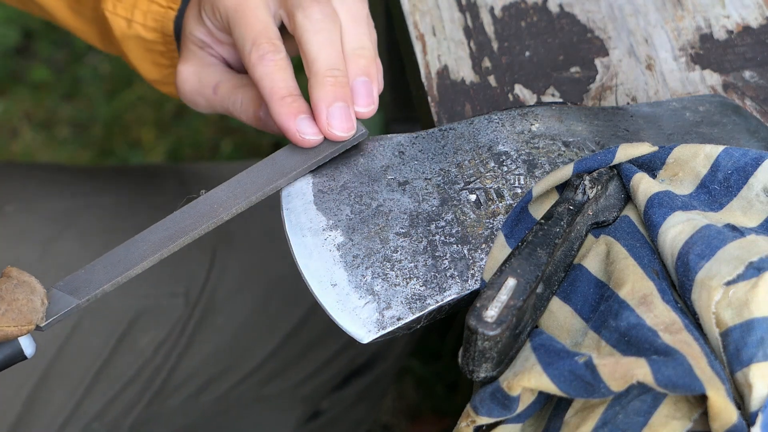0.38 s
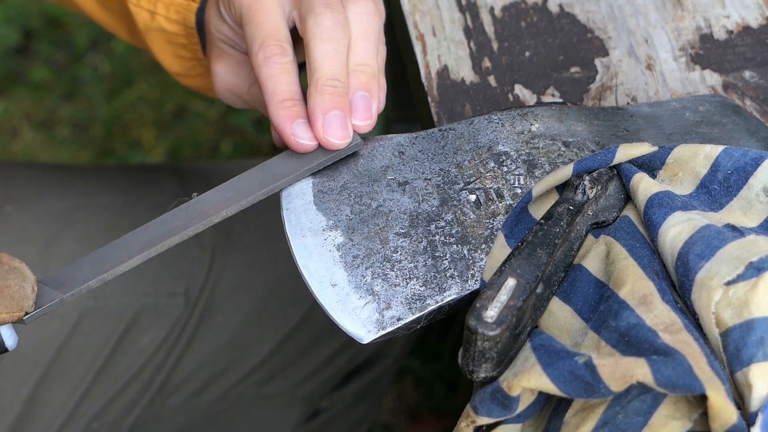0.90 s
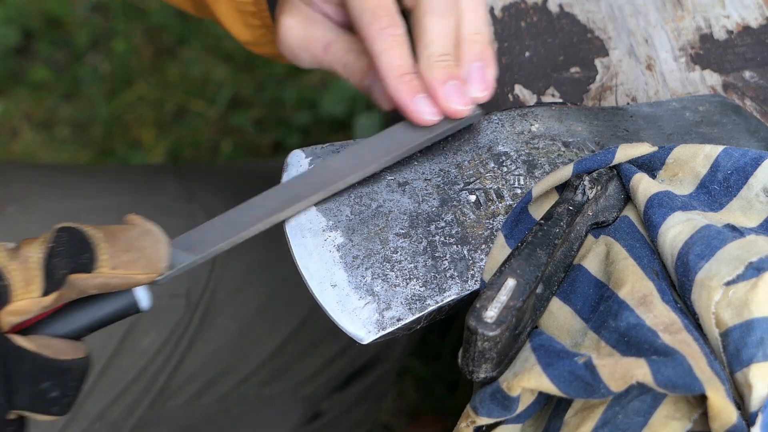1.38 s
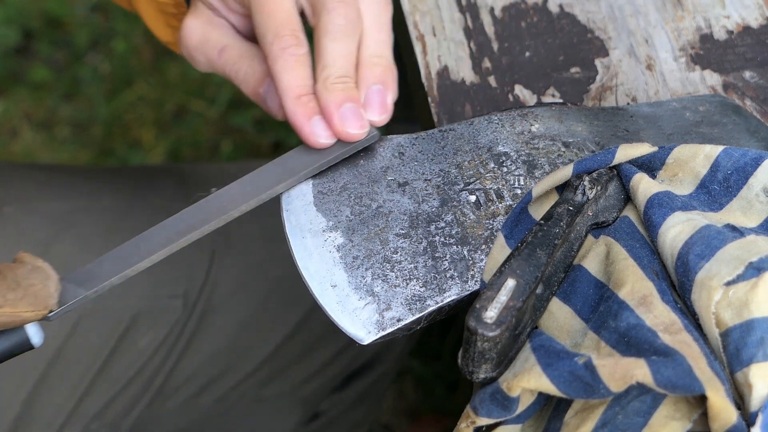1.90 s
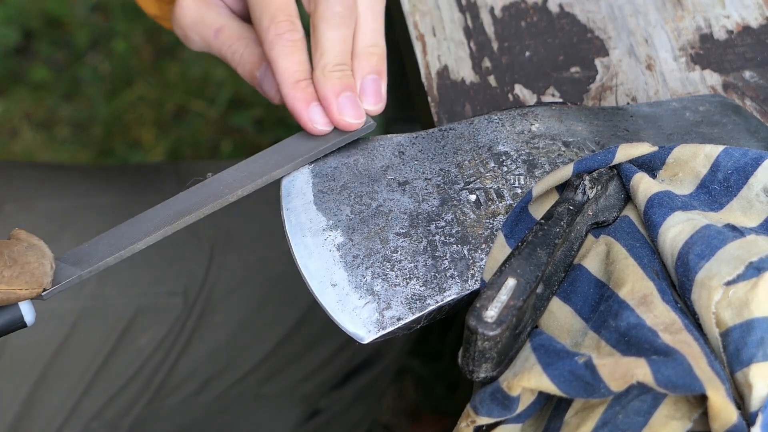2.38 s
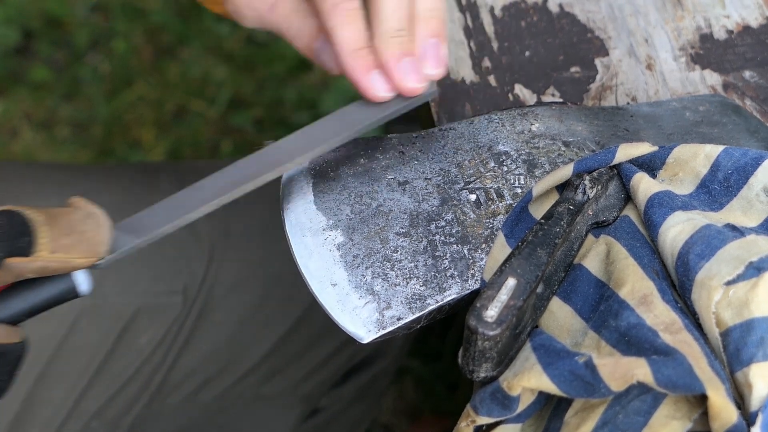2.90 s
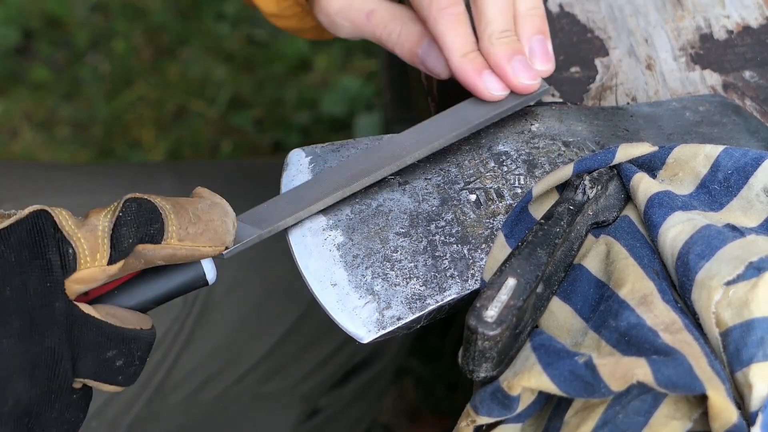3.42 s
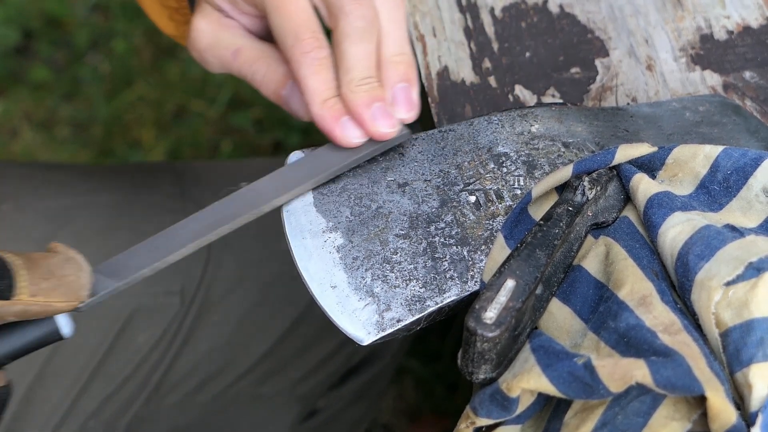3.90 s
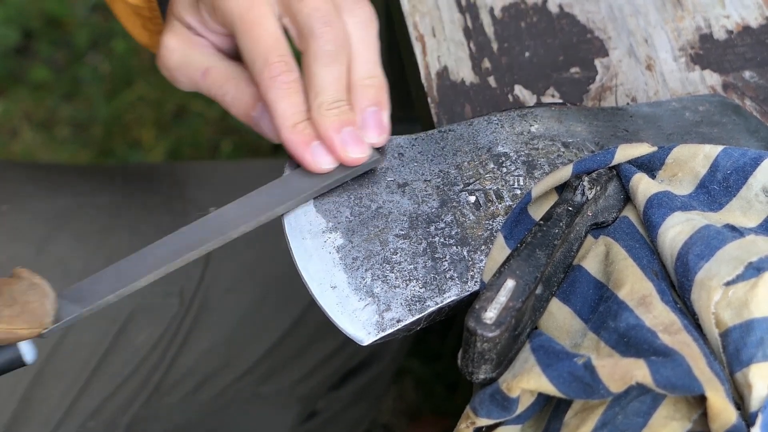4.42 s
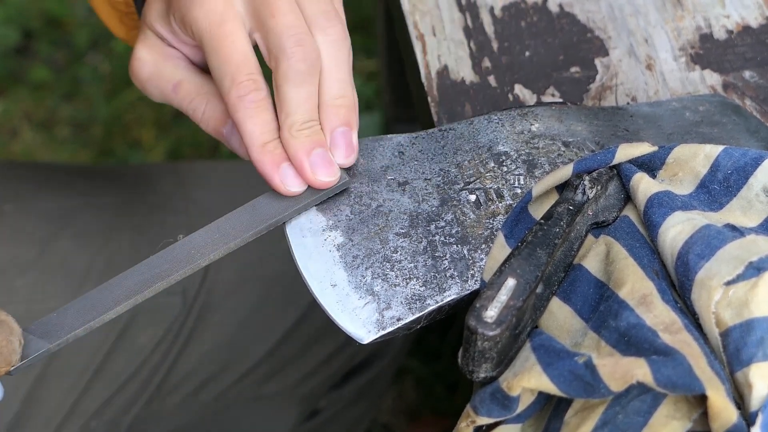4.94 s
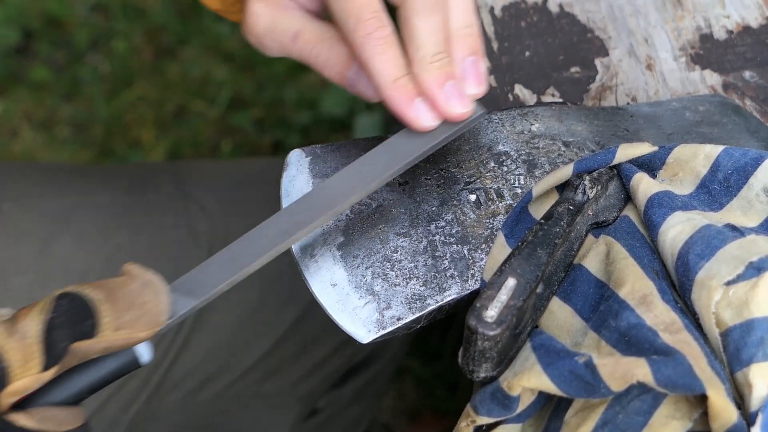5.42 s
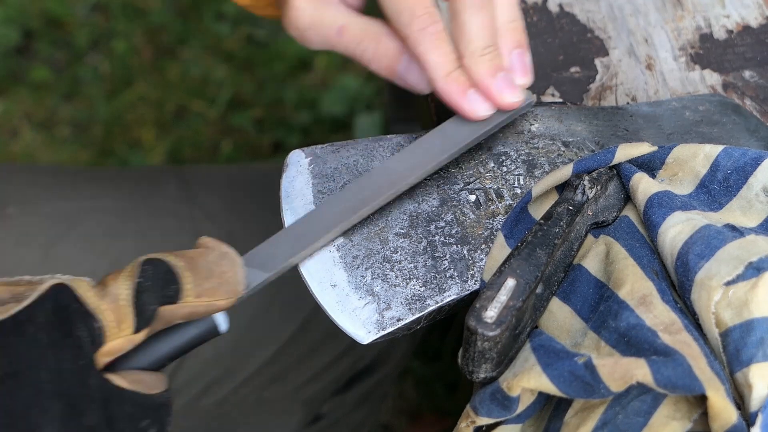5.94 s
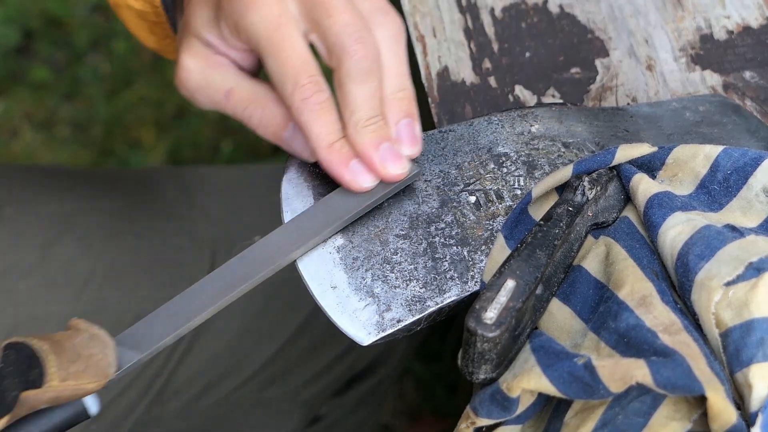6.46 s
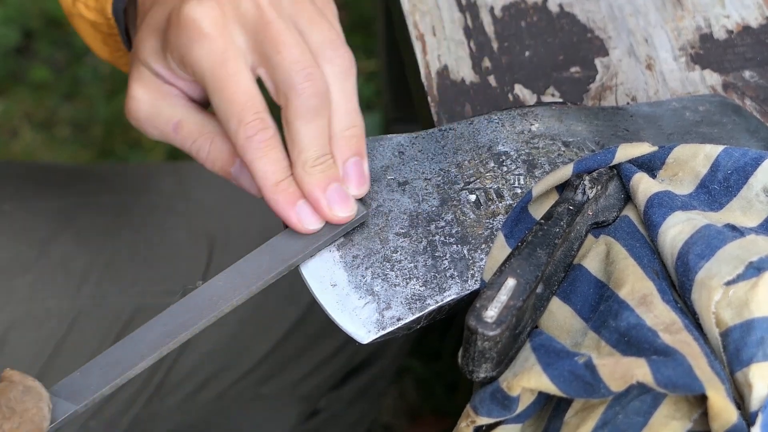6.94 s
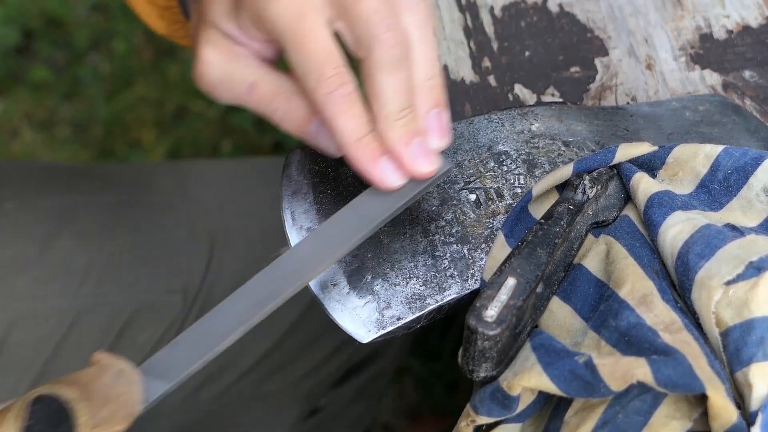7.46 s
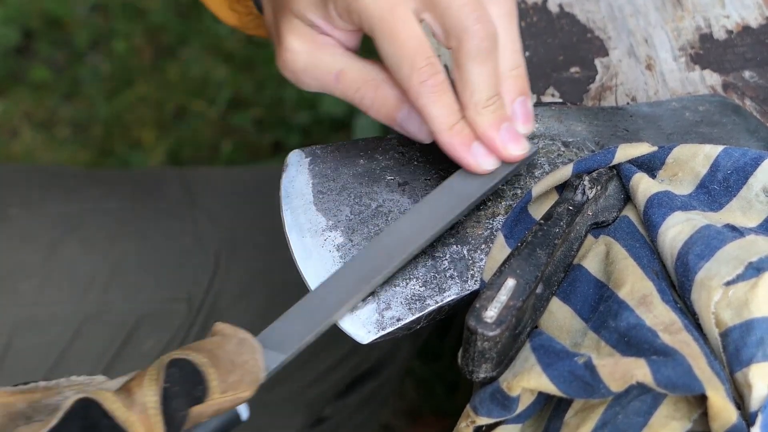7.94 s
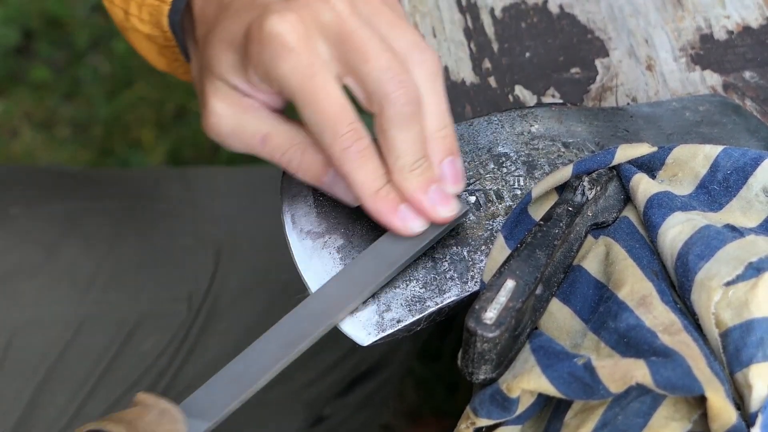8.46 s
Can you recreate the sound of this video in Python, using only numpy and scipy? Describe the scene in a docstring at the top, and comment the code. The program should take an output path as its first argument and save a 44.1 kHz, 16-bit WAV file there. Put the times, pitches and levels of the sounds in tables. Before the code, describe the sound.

Close outdoors, a flat steel file works an axe head resting on a log. Two light clacks and faint scrapes come first, then a swelling rasp, then regular strokes about every two thirds of a second: hard clack, brief skid, bright gritty push, quick lift-off. Many rasps carry a falling toothy whine, and some end in a thin squeal. Wide, soft air wash lies behind, with a faint low hum later.

```python
"""Outdoors, close to an axe on a log: a wide, quiet wash of air lies under everything from the start.
A flat steel file lands on the edge with a clack, skids, and is pushed across it, stroke after stroke.
Struck or rubbed, the same modes of file, axe head and log ring; ground, clamp and a wall some metres off answer.
In many strokes, early and late, a falling tooth tone joins the rasp; thin squeals mark some lift-offs.
A low far hum comes up later."""
import sys
import numpy as np
from scipy import signal
from scipy.fft import rfft, irfft, next_fast_len
from scipy.io import wavfile
from scipy.ndimage import uniform_filter1d

SR = 44100
rng = np.random.default_rng(int(sys.argv[2]) if len(sys.argv) > 2 else 0)


def to_wav(sig):
    """Store sig (one row per channel, or 1-D mono) as 16-bit WAV at the path in sys.argv[1].

    Samples outside -1..1 are clipped; the rate is SR.
    """
    pcm = np.clip(np.atleast_2d(sig), -1, 1) * 32767
    pcm = np.round(pcm).astype(np.int16)
    wavfile.write(sys.argv[1], SR, pcm.T)  # frames by channels


N = 378819  # length in samples


def gain_of(db):
    """Decibels to an amplitude factor."""
    return 10 ** (np.asarray(db) / 20)


def evened(x):
    """Scales to rms 1."""
    return x / np.sqrt(np.mean(x ** 2) + 1e-20)


def read(points, hz):
    """Reads a table on a log-frequency axis."""
    f, value = np.transpose(points)
    return np.interp(np.log(hz + 1), np.log(f + 1), value)


def along(points):
    """Reads a curve over time at every sample."""
    s, value = np.transpose(points)
    return np.interp(np.arange(N) / SR, s, value)


def add(mix, s, sound):
    """Mixes a sound in at time s."""
    part = mix[:, round(s * SR):][:, :sound.shape[1]]
    part += sound[:, :part.shape[1]]


def coloured(x, points):
    """Filters by a spectrum in dB, then scales to rms 1."""
    size = next_fast_len(N)
    spectrum_gain = gain_of(read(points, np.fft.rfftfreq(size, 1 / SR)))
    return evened(irfft(rfft(x, size) * spectrum_gain, size)[..., :N])


def drift(per_s):
    """Slow random wander of rms about 1: straight lines between random knots."""
    knots = rng.standard_normal(int(N / SR * per_s) + 2)
    return np.interp(np.arange(N) / SR * per_s, np.arange(len(knots)), knots) * np.sqrt(3 / 2)


# modes of file, axe head and log: [f/Hz, t60/s when rubbed, relative level/dB rubbed, relative level/dB struck]
MODES = [(165, 0.17, -4.5, -13), (226, 0.092, -4, -27), (332, 0.065, 4.5, 5.5), (468.6, 0.059, -1.5, -0.5),
         (544, 0.035, 0.5, 4), (611.7, 0.16, -10.5, -7), (773, 0.079, -13, -7), (991, 0.032, -14.5, -18.5),
         (1120, 0.05, -16, -26), (1290, 0.018, -11, -13), (1620, 0.022, -16, -10), (1847, 0.033, -8.5, -13),
         (2116, 0.01, -2, 0.5), (2446, 0.025, -10.5, -12.5), (2730, 0.033, -8.5, -9.5),
         (2862, 0.032, 5.5, -11), (3086, 0.04, -2, -7.5), (3365, 0.04, 4, -9.5), (3970, 0.0078, -31, -15),
         (4570, 0.021, -2.5, 3), (5285, 0.012, -8, -14), (5564, 0.014, 0, 12), (6370, 0.011, -5, 5),
         (7170, 0.042, -7, -0.5), (7800, 0.04, -13.5, -9), (8280, 0.0056, 4.5, 8), (9400, 0.017, -2, 2),
         (10030, 0.013, -5, -4), (11030, 0.0077, -14, -15)]
# borders of the five mode groups, log thud, axe head, blade, upper ring, top treble: [f/Hz]
GROUP_TOPS_HZ = [900, 2610, 4100, 8250]


def mode_shares(db):
    """Group of each mode, and its gain so that every group has power 1."""
    group = np.searchsorted(GROUP_TOPS_HZ, [m[0] for m in MODES])
    power = gain_of(db) ** 2
    return group, np.sqrt(power / np.bincount(group, power)[group])


# stereo lean of the steel at the microphone: [f/Hz, left minus right level/dB]
LEAN = [(60, 0.5), (130, -4), (290, -3.5), (640, -5), (1410, 1.5), (3100, 1), (6820, -1), (15000, 4.5)]


def sides(hz):
    """Left and right gains at a frequency: half the lean each way."""
    return gain_of(read(LEAN, hz) * np.array([[.5], [-.5]]))


# wash common to both sides: [f/Hz, relative level/dB per Hz]
AIR_MID = [(18, -62), (30, -32), (154, -6.5), (253, -9), (374, -8.5), (415, -9), (645, -12), (928, -12.5),
           (2370, -21), (3590, -26), (9150, -27.5), (15000, -40)]
# wash opposed between the sides: [f/Hz, relative level/dB per Hz]
AIR_SIDE = [(18, -71.5), (30, -37), (122, -2.5), (312, -0.5), (629, -5.5), (928, -9), (2430, -21.5),
            (2990, -25), (4090, -31), (5300, -31), (15000, -39)]
# level of the common wash, before its drift: [t/s, level/dB]
AIR_LEVEL = [(0, -58.5), (.6, -54.5), (1.7, -55.5), (3.3, -52.5), (5.2, -55.5), (8.2, -54)]
# level of the far hum midway between the sides: [t/s, level/dB]
HUM_LEVEL = [(3.6, -79.5), (4.8, -61), (5.5, -55.5), (6.5, -64), (7.5, -57), (8.2, -73)]


def air():
    """Far wash of filtered noise, wider than it is central and drifting, with a low wavering narrow-band hum."""
    noise = rng.standard_normal((3, N))
    mid = coloured(noise[0], AIR_MID)
    side = gain_of(5.5) * coloured(noise[1], AIR_SIDE)
    wash = gain_of(along(AIR_LEVEL) + 1.23 * drift(3.3)) * np.array([mid + side, mid - side])
    # (f/Hz, level/dB)
    hum = coloured(noise[2], [(120, -36), (150, 15), (163, 7), (178, 3), (215, -76.5)])
    lean = gain_of([[-1], [1]])  # right 2 dB above left
    return wash + gain_of(along(HUM_LEVEL)) * hum * lean


# landings of the file: [t/s, reference level/dB, then against it, before the offsets of each group:
# log thud level/dB, upper ring level/dB; and by itself: skid level/dB]
CLACKS = [(0.267, -17, -12, -9.5, -45.5), (0.417, -17, -15, -8.5, -60), (1.824, -12, -20.5, -3.5, -64),
          (2.401, -11.5, -16.5, -6, -33.5), (3.119, -1, -24, -14.5, -43), (3.756, 0, -28, -8, -43),
          (4.336, -3.5, -23.5, -5.5, -33.5), (4.43, -30, -25, -6, -50), (4.925, -7, -24, -6.5, -31),
          (5.657, -2, -28.5, -4.5, -43), (6.328, -3.5, -25.5, -5, -38), (6.971, -6.5, -18.5, -1, -34.5),
          (7.644, -1.5, -20.5, -5.5, -45), (8.268, -7.5, -15, -1.5, -32)]
# where the log answers a landing most strongly: [t/s, f/Hz]
THUD_HZ = [(.27, 500), (.42, 600), (4.3, 610), (6.3, 545), (7, 450)]


def clack(row, luck):
    """A short hard contact cracks and sets every mode ringing; the landing spot picks the log modes that answer."""
    s, db, thud_db, upper_db, _ = row
    count = 6000
    thud_hz = np.interp(s, *np.transpose(THUD_HZ))
    hz, t60, _, struck_db = np.transpose(MODES)
    octaves_off = abs(np.log2(hz / thud_hz))
    spot_db = -np.minimum(25 * octaves_off, 12) * (hz < GROUP_TOPS_HZ[0])
    chance_db = 3 * luck[0]
    group, share = mode_shares(struck_db + spot_db + chance_db)
    group_db = np.array([thud_db + 7, -9, -6, upper_db + 3.5, upper_db - 9])
    size = share * gain_of(db + group_db[group])

    age = np.arange(count) / SR
    t = np.maximum(age[:, None] - 0.000194 * abs(luck[1]), 0)  # waves reach the air with small delays
    rise = 1 - np.exp(-t * hz / 1.37)
    decay = gain_of(-60 * t / (0.77 * t60))  # a struck mode dies sooner than a rubbed one
    rings = size * rise * decay * np.sin(2 * np.pi * hz * t) * np.sign(luck[2])

    crack_envelope = gain_of(db + upper_db - 10.5 - 60 * age / 0.0088) * np.minimum(age / 0.00056, 1)
    crack = crack_envelope * rng.standard_normal(count)
    band = signal.butter(2, [1200, 11000], "bandpass", fs=SR, output="sos")
    crack = signal.sosfilt(band, crack)
    return s - .0001, sides(hz) @ rings.T + crack


def yard(x):
    """Scattered ground and clamp reflections, then the slap from a wall, as sparse random echoes on each side."""
    t = np.arange(SR // 4) / SR
    taps = rng.standard_normal((2, len(t))) * (rng.random((2, len(t))) < 3000 / SR)
    near = gain_of(-21 - 60 * t / 0.043) * (t > .002)
    wall = gain_of(-27) * np.exp(-((t - .0285) / .001) ** 2)  # 28.5 ms late: about 5 m off
    dull = signal.lfilter(*signal.butter(1, 6000, fs=SR), taps * (near + wall))
    return signal.oaconvolve(x.mean(0)[None], dull, axes=1)[:, :N]


def pressure():
    """Rasp strength for the five mode groups: the strokes, and the short skid after each landing."""
    level = np.zeros((5, N))
    for row in STROKES:
        add(level, *stroke(*row))
    t = np.arange(SR // 8) / SR
    group_db = np.array([[-3], [-5], [-1], [-6], [-24]])
    for s, *_, skid_db in CLACKS:
        skid_s = .05 + .002 * (skid_db + 40)  # a harder skid lasts longer
        add(level, s, gain_of(skid_db - 14.5 * (t / skid_s) ** 4 + group_db))
    return level


# likeness of the rasp's drive on the two sides: [f/Hz, left-right likeness 0-1]
SAME = [(60, 0.15), (180, 0.48), (550, 0.94), (1650, 0.91), (4970, 0.96), (15000, 0.72)]


def rasp():
    """Uneven tooth bites drive the modes; each mode swells and fades as the contact moves along the file."""
    level, whistle = pressure(), np.zeros((2, N))
    for row in TEETH:
        add(whistle, *teeth(*row))

    bitten = rng.random(N) < 9000 / SR  # 9000 bites a second on average
    size = gain_of(2.7 * np.minimum(rng.exponential(1, N), 5)) * bitten
    # three sets of signs on the same bites: common, left, right
    bites = evened(size * gain_of(0.85 * drift(150))) * rng.choice([-1., 1.], (3, N))

    rings = np.zeros((2, 2, N))  # the four lower groups together, then the top treble
    group, share = mode_shares([m[2] for m in MODES])
    wander_db = (2.2, 3.23, 3.64, 4.3, 4.2)  # for each group
    for (hz, t60, _, _), g, a in zip(MODES, group, share):
        same = np.clip(read(SAME, hz), 0, 1)
        force = np.sqrt(same) * bites[0] + np.sqrt(1 - same) * bites[1:]
        drive = force * (level[g] * gain_of(wander_db[g] * drift(16) - 6.0))
        drive = drive + gain_of(-22.0) * whistle  # a mode flares while the tooth tone crosses it
        # two-pole resonator
        r, w = np.exp(-np.log(1000) / (t60 * SR)), 2 * np.pi * hz / SR
        strike = np.sqrt(1 - r * r) * np.array([1, 0, -1])
        ring = signal.lfilter(strike, [1, -2 * r * np.cos(w), r * r], drive)
        rings[int(g == len(GROUP_TOPS_HZ))] += a * sides(hz) * ring

    # heavy modes shed no top treble
    body = signal.sosfilt(signal.butter(4, 8600, fs=SR, output="sos"), rings[0])
    scrape = grit(bites[0] + 0.33 * bites[1:], level)
    return body + rings[1] + gain_of(-2.5) * whistle + scrape


# colour of the scrape, evened out within each mode group: [f/Hz, relative level/dB per Hz]
GRIT = [(60, -40), (130, -11), (500, -5), (1430, -21), (3390, -4.5), (3840, -8.5), (4540, -4.5),
        (7350, -2.5), (9500, -22.5), (11500, -33), (14500, -22), (16000, -50)]


def grit(bites, level):
    """The unringing part of the scrape: mottled patches of hiss that follow the pressure of each group."""
    hz, t, z = signal.stft(bites, SR, nperseg=256, noverlap=192)
    group = np.searchsorted(GROUP_TOPS_HZ, hz)
    shape = gain_of(read(GRIT, hz))
    shape = shape / np.sqrt(np.bincount(group, shape ** 2) / len(hz))[group]
    patches = rng.standard_normal((len(t), len(hz))).T
    patches = uniform_filter1d(patches, size=4, axis=0)  # across frequency
    patches = evened(uniform_filter1d(patches, size=16, axis=1))  # across time
    at_frame = np.minimum(t * SR, N - 1).astype(int)
    press = level[:, at_frame] * gain_of([[-9], [-6], [-8], [-7], [2.5]])
    z = z * (shape * sides(hz))[:, :, None] * press[group] * gain_of(6.04 * patches - 7.0)
    return signal.istft(z, SR, nperseg=256, noverlap=192)[1][:, :N]


# pushes of the file: [start t/s, full pressure t/s, lift-off t/s, reference level/dB,
# level change by lift-off/dB, file laid flat 0-1]
STROKES = [(0.517, 0.555, 0.73, -65, 0.1, .4), (.82, .93, .985, -49, 2.5, .55),
           (1.09, 1.374, 1.504, -35, 10.5, 0.07), (1.852, 2.038, 2.178, -30.5, -2.5, .11),
           (2.465, 2.69, 2.819, -33.5, 3.5, .21), (3.134, 3.354, 3.478, -31.5, 7, .16),
           (3.803, 3.981, 4.133, -30, 4, .11), (4.4, 4.549, 4.714, -28.5, -9, .27),
           (5.003, 5.16, 5.37, -33, -3.5, .34), (5.696, 5.851, 6.058, -34.5, 3, .45),
           (6.366, 6.482, 6.72, -39.5, 8, .68), (7.04, 7.171, 7.386, -37, 2, .74),
           (7.685, 7.821, 8.045, -33.5, 1.2, .39), (8.351, 8.498, 8.62, -29.5, -0.9, .22)]
# The next tables hold one value for each mode group.
# reach of a push at full pressure, against its reference: [level/dB]
GROUP_DB = [-4, -11.5, 0.6, 0.8, -26.5]
# gained when the file is laid wholly flat: [level/dB]
FLAT_DB = [12, 10.2, 4.5, -0.5, 13.5]
# climbed from start to full pressure: [level/dB]
BUILD_DB = [7.2, 23.4, 31.2, 31.3, 36.4]
# bend of that climb: [exponent, above 1 = fast at first]
BUILD_BEND = [2.8, 1.87, .86, 1.5, 1.7]
# peak ahead of full pressure: [t/s]
LEAD_S = [-.086, 0.00069, -.004, .001, .028]
# lost by lift-off: [level/dB]
SAG_DB = [13, .8, .6, 12.5, 8]
# lull (below 0: swell) between full pressure and lift-off: [level/dB]
DIP_DB = [1.1, -5.6, 2.6, -4, -7.5]
# fall after lift-off: [dB per s]
LIFT_DB_PER_S = [450, 770, 850, 850, 800]


def stroke(start, full, lift, db, change_db, flat):
    """One push: pressure builds to a peak, sags or swells on the way across, and drops at lift-off."""
    begin = start - (full - start) / 2
    t = np.arange(begin, lift + .12, 1 / SR)[:, None]
    peak = np.minimum(full - np.array(LEAD_S), lift - .005)
    to_go = np.maximum(peak - t, 0) / (full - start)
    held = np.clip((t - peak) / (lift - peak), 0, 1)  # 0 at the peak, 1 at lift-off
    build_db = -to_go ** np.array(BUILD_BEND) * BUILD_DB
    hold_db = change_db * held - held ** 2 * SAG_DB - np.sin(np.pi * held) * DIP_DB
    fall_db = -np.maximum(t - lift, 0) * LIFT_DB_PER_S
    full_db = db + np.array(GROUP_DB) + flat * np.array(FLAT_DB)
    return begin, gain_of(full_db + build_db + hold_db + fall_db).T


# teeth passing the edge as the push slows: [start t/s, first rate f/Hz, last rate f/Hz, relative level/dB]
TEETH = [(.69, 5400, 3200, -62), (1.39, 3500, 1700, -36), (2.68, 2870, 1900, -43), (3.365, 2900, 1900, -35),
         (4.03, 3300, 1900, -37), (5.84, 3000, 2100, -38.5), (6.551, 3300, 1300, -49),
         (7.2, 3000, 1670, -36), (7.83, 3100, 1700, -36), (8.475, 3200, 1900, -34)]


def teeth(s0, start_hz, end_hz, db):
    """The tooth-passing tone with its overtones: unsteady, and falling as the push slows."""
    count = round(.13 * SR)  # lasts 0.13 s
    jitter = 0.0566 * evened(uniform_filter1d(rng.standard_normal(SR // 4), size=30))[:count]
    turn = 2 * np.pi * np.cumsum(np.geomspace(start_hz, end_hz, count) * (1 + jitter)) / SR
    # harmonics 2 to 5
    overtones = sum(gain_of(d) * np.cos(k * turn) for k, d in enumerate((-14, 7.5, 3, -10), 2))
    tone = np.sqrt(2) * np.cos(turn) + gain_of(-12) * overtones
    return s0, gain_of(db) * tone * signal.windows.tukey(count, .6) * np.ones((2, 1))


# squeals of the freed file about lift-off: [start t/s, level/dB before roughness and fade]
SQUEALS = [(1.46, -48), (4.08, -42), (4.655, -48), (5.305, -46), (5.99, -43)]


def squeal(s, db):
    """A rough thin tone that glides down towards the file's free ring, swelling and fading."""
    length_s, start_hz, end_hz = .09, 7550, 7080
    t = np.arange(0, length_s, 1 / SR)
    rough = evened(uniform_filter1d(rng.standard_normal((2, SR // 4)), size=40))[:, :len(t)]
    hz = np.geomspace(start_hz, end_hz, len(t)) * (1 + .015 * rough[0])
    tone = np.sqrt(2) * np.cos(2 * np.pi * np.cumsum(hz) / SR) * gain_of(db + 3.1 * rough[1])
    return s, tone * np.sin(np.pi * t / length_s) * np.ones((2, 1))


def scene():
    """File and axe close by, their reflections and the open air."""
    steel = rasp()
    for row in SQUEALS:
        add(steel, *squeal(*row))
    luck = rng.standard_normal((len(CLACKS), 3, len(MODES)))  # per mode: level, delay, sign
    for row, chance in zip(CLACKS, luck):
        add(steel, *clack(row, chance))
    # too small to radiate bass
    steel = signal.sosfilt(signal.butter(2, 120, "highpass", fs=SR, output="sos"), steel)
    return steel + yard(steel) + air()


def top_cut(x):
    """Nothing passes above the cut-off."""
    return signal.sosfilt(signal.butter(12, 16540, fs=SR, output="sos"), x)


def record(dry):
    """The small microphone drops the top treble."""
    soft = signal.sosfilt(signal.butter(8, 15400, fs=SR, output="sos"), dry)
    return top_cut(soft)


dry = scene()
out = record(dry)
to_wav(out)
```